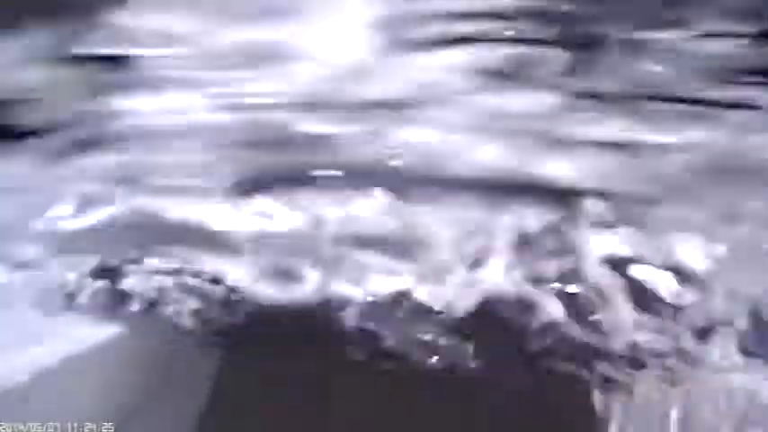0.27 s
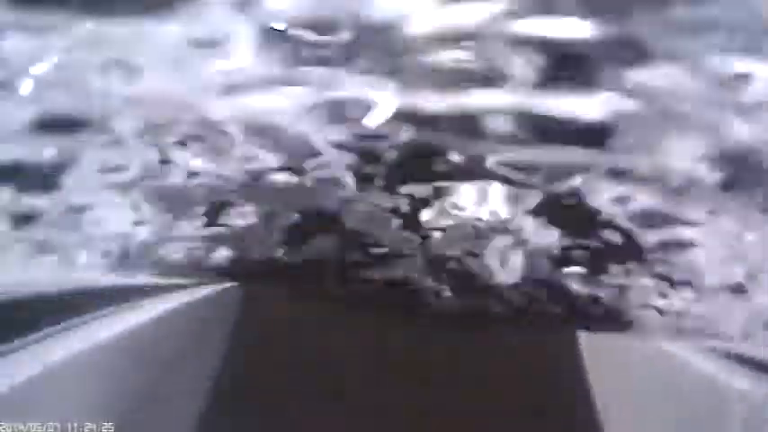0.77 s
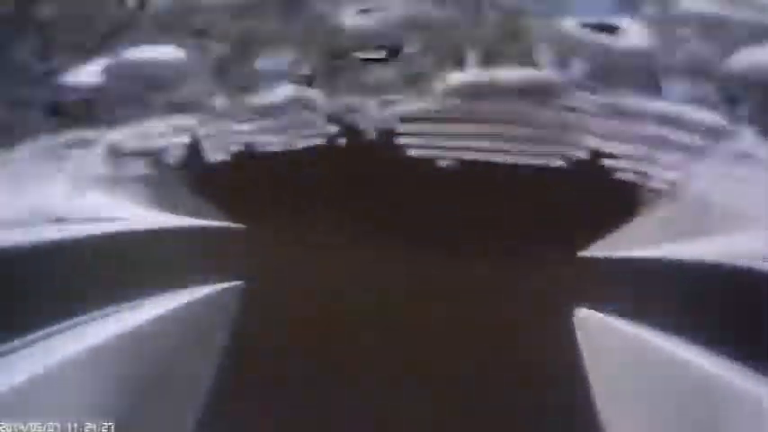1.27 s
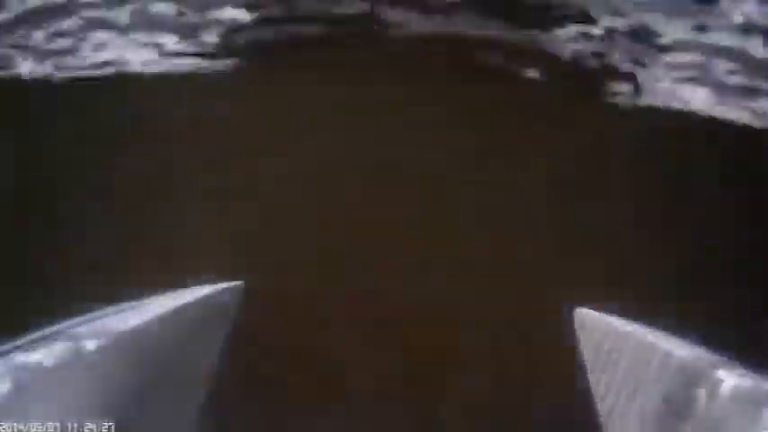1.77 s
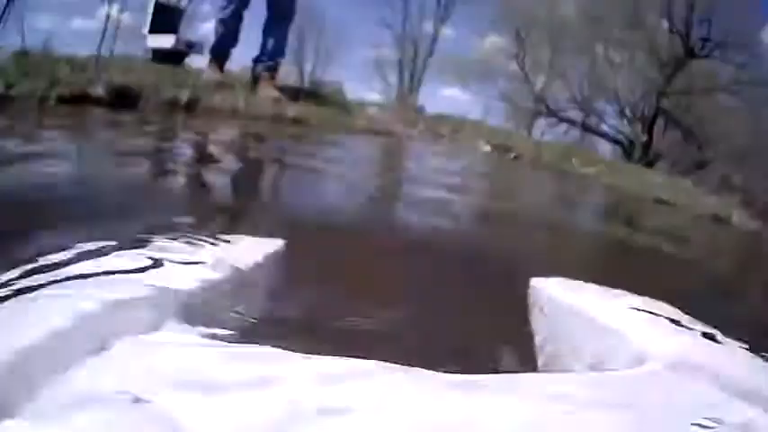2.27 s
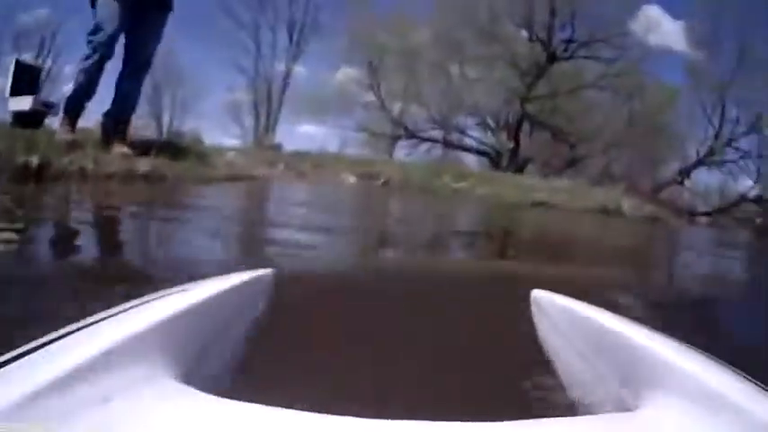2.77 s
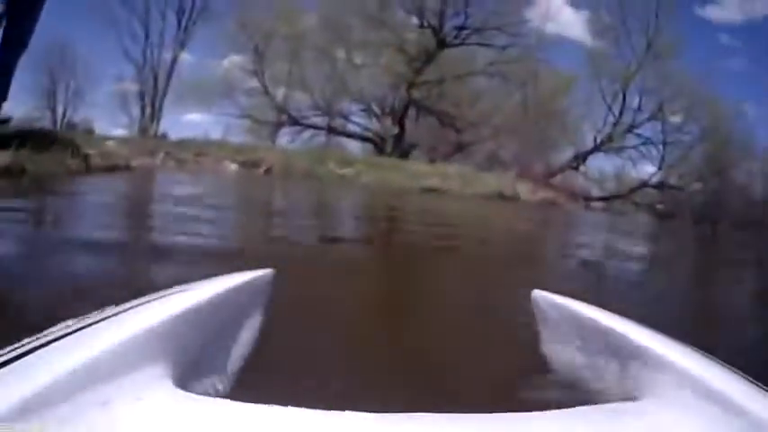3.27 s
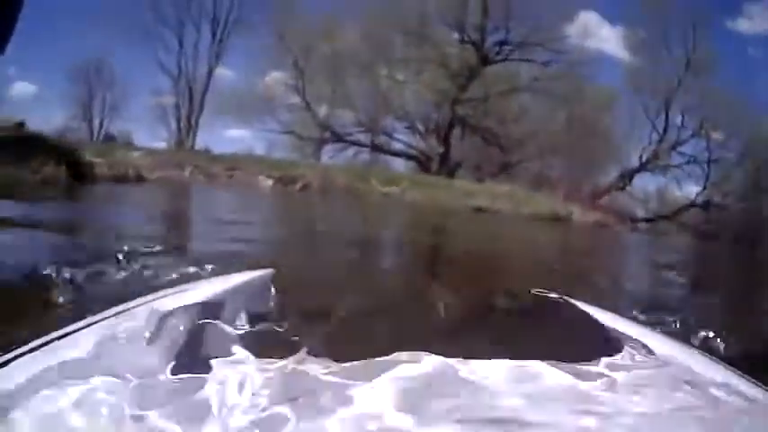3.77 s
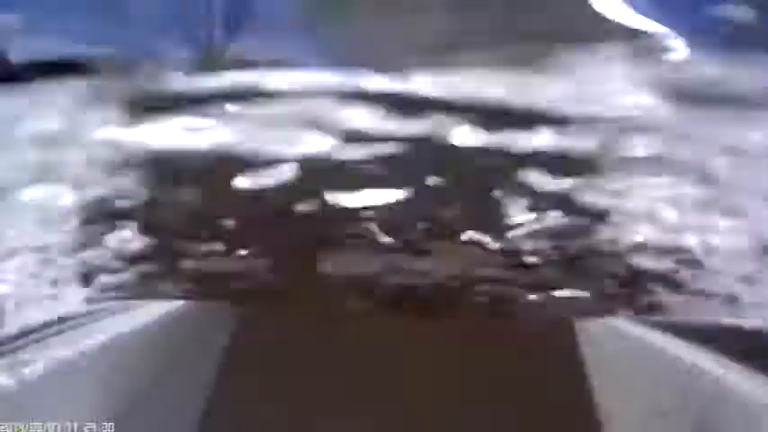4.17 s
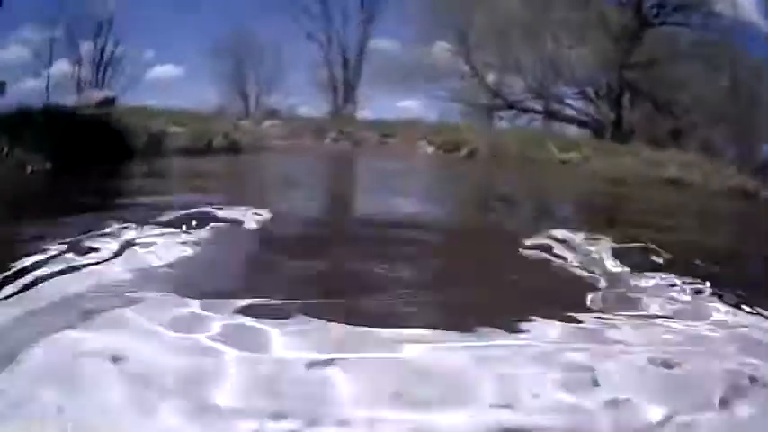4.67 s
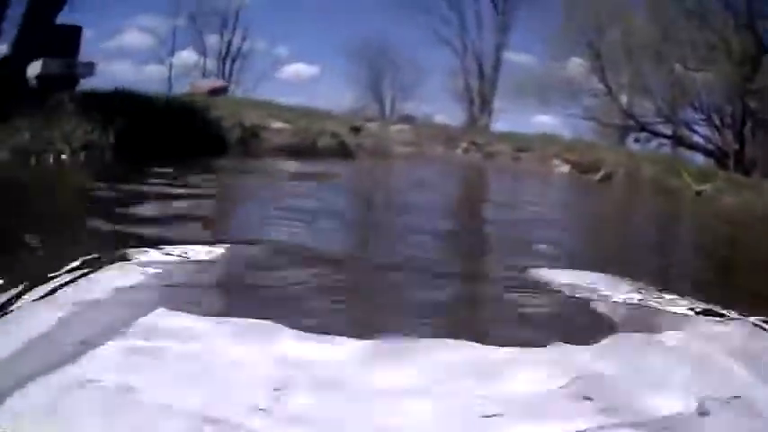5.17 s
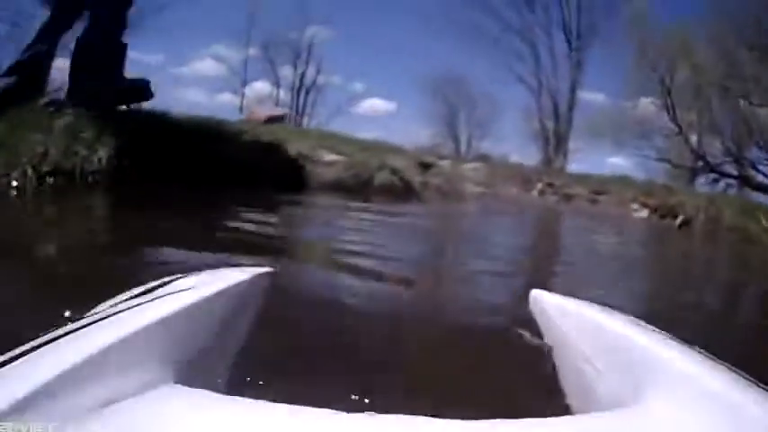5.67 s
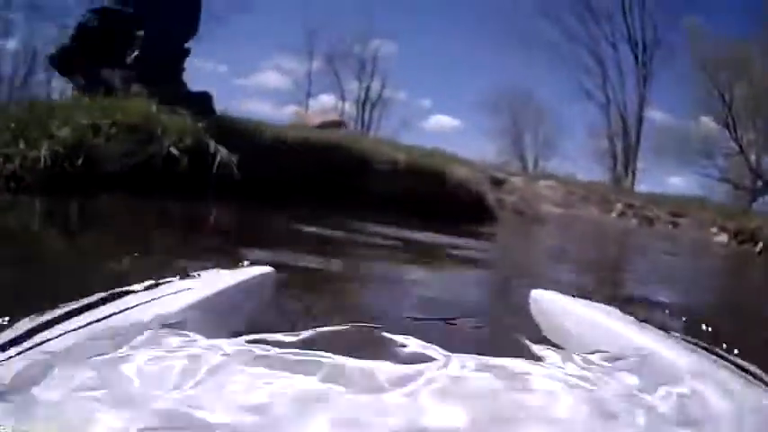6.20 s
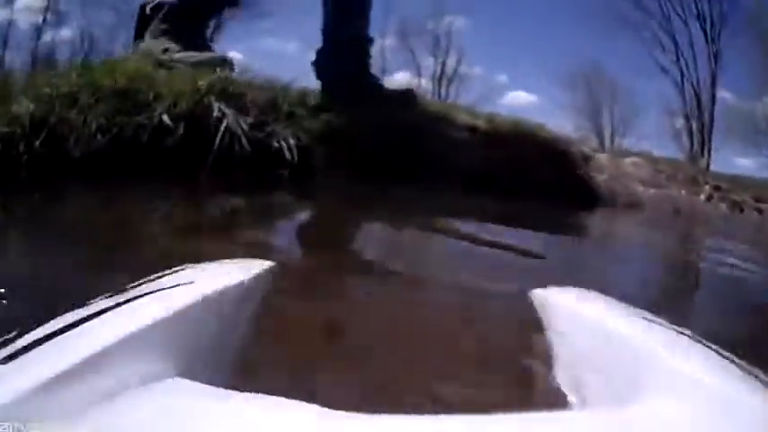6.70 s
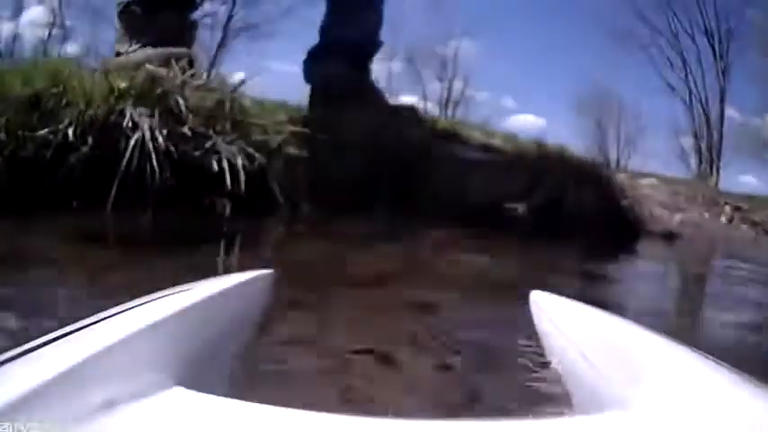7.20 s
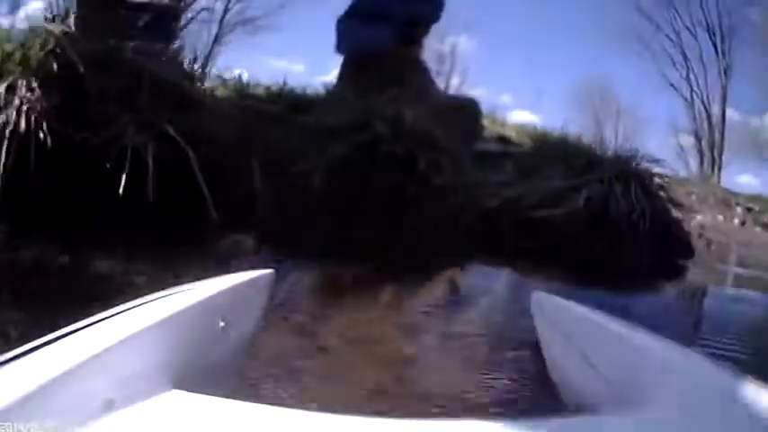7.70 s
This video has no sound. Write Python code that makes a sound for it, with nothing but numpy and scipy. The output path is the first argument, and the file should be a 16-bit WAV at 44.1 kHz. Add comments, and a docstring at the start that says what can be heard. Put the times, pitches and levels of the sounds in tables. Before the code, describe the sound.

Close inside a sealed case on a small model boat in a pond, a muffled electric drone and rattle run under water, surge as it surfaces, then sag and rev unevenly with a thin high whistle. Water churns, gulps and knocks the plastic hull. After a sharp racing rasp come short throttle bursts, dripping, a buzzing rudder servo and near silence.

```python
"""Small model boat at the edge of a pond

A small electric boat labours, heard from inside a sealed case on its deck. The shaft drones through the
plastic hull, the propeller churns water and rattles in its loose drive, and the speed controller whistles.
Throttle blips, ringing knocks, gulping air pockets and drops follow; a rudder servo buzzes, then the boat
comes to rest. Tones make the drone and whistle, shaped noise the water, struck resonances the hull."""
import sys
import numpy as np
from scipy import signal
from scipy.fft import rfft, irfft
from scipy.io import wavfile
from scipy.ndimage import uniform_filter1d

SR = 44100
rng = np.random.default_rng(int(sys.argv[2]) if len(sys.argv) > 2 else 0)


def pcm_store(signal):
    """Save signal as 16-bit PCM."""
    levels = np.round(np.clip(np.atleast_2d(signal), -1, 1) * 32767)
    wavfile.write(sys.argv[1], SR, levels.astype(np.int16).T)


N = 350233
TIME = np.arange(N) / SR   # seconds

# Speed of the shaft. Each row: time in seconds, turns per second.
SPEED = [(0.0, 137), (0.74, 121), (0.81, 131), (0.95, 113.7), (1.03, 126), (1.149, 121.7), (1.2, 112.6),
         (1.25, 125.4), (1.5, 124.8), (1.561, 116), (1.67, 125.4), (1.771, 132.6), (1.82, 147), (1.87, 159),
         (1.929, 210), (1.989, 191), (2.05, 136), (2.13, 137), (2.25, 75), (2.446, 65.5), (2.52, 82.6),
         (2.72, 66), (2.81, 60.2), (2.926, 66.4), (3.019, 95), (3.129, 66), (3.2, 52.5), (3.399, 91.5),
         (3.468, 105), (3.531, 131.6), (3.621, 112), (3.705, 79.7), (3.82, 81), (3.9, 136), (4.027, 185),
         (4.143, 117), (4.384, 58), (4.55, 75), (4.62, 63.7), (4.75, 70), (4.8, 141), (4.825, 203),
         (4.871, 227), (4.899, 186), (4.931, 130)]
# How hard the propeller works. Each row: time in seconds, effort in dB.
EFFORT = [(0.0, -34), (1.1, -32), (1.87, -34), (1.93, -28.5), (2.03, -38.5), (2.199, -41.5), (2.33, -32),
          (2.75, -33.5), (2.95, -28), (3.12, -37.5), (3.16, -44.5), (3.258, -38), (3.268, -29.5),
          (3.31, -32), (3.59, -34.5), (3.65, -46.5), (3.695, -42), (3.71, -34), (3.76, -35), (3.812, -25.5),
          (3.84, -39.5), (3.9, -28), (4.06, -31), (4.17, -49), (4.395, -41.5), (4.41, -36), (4.449, -26.5),
          (4.56, -32.5), (4.649, -41), (4.77, -32.5), (4.821, -31.5), (4.835, -20.5), (4.886, -26),
          (4.9, -42), (5.0, -61)]
# The speed controller's switching whistle. Each row: time in seconds, level in dB.
WHISTLE_LEVEL = [(0, -67), (1.79, -63), (2.04, -73.5), (2.73, -49.5), (3.49, -51), (3.72, -69), (3.83, -60),
                 (4.11, -68), (4.16, -82), (4.385, -82), (4.41, -65), (4.87, -60), (4.92, -82)]
# Ringing modes of the hull; some sounds shorten or level them.
# Each row: pitch in Hz, level in dB, time in seconds to fade by 60 dB.
HULL_MODES = [(211, 8, 0.047), (414, -4, 0.021), (535, -36, 0.0096)]
# Drifting in to the bank. Each row: time in seconds, lapping on the hull in dB, servo whirr in dB.
DRIFT_IN = [(6.078, -68, -51), (6.14, -55, -57), (6.258, -44.5, -59), (6.313, -35.5, -33.5),
            (6.42, -35.5, -38), (6.46, -45, -52.5), (6.64, -37.5, -62), (6.75, -53, -59), (6.8, -44, -43),
            (6.88, -42, -88), (7.0, -94, -66)]

SURFACES_S = 1.5   # until then the hull runs under water
DUNKED_FROM_S, DUNKED_UNTIL_S = 4.3, 4.8   # the bow dips under again
DRIPS_FROM_S, DRIPS_UNTIL_S = 4.1, 6.9
USUAL_EFFORT_DB = -35
RASP_FROM_PER_S = 189   # turns per second from which the play starts to slam shut


def from_db(db):
    """Turn decibels into gain."""
    return 10 ** (np.asarray(db) / 20)


def rms_one(x):
    """Scale to an average strength (rms) of 1."""
    return x / np.sqrt(np.mean(x ** 2) + 1e-20)


def in_time(rows):
    """Draw the columns of a timed table as curves, one value per sample."""
    s, *columns = np.transpose(rows)
    return [np.interp(TIME, s, column) for column in columns]


def during(start, end, edge_s):
    """Open a gate from start to end, with short ramps."""
    return np.clip(np.minimum(TIME - start, end - TIME) / edge_s, 0, 1)


def drift(rate_hz):
    """Wander slowly by chance with a spread of 1, worked out at every 16th sample."""
    r = np.exp(-32 * np.pi * rate_hz / SR)
    slow = signal.lfilter([1], [1, -2 * r, r * r], rng.standard_normal(N // 16 + 3002))
    slow = slow[3000:]   # skip the start-up
    return np.interp(np.arange(N) / 16, np.arange(len(slow)), rms_one(slow))


def colour(x, spectrum):
    """Filter by a (Hz, dB) spectrum that responds only after its input; rms 1."""
    hz, level_db = np.transpose(spectrum)
    grid = np.linspace(0, SR / 2, 2049)
    gain = from_db(np.interp(np.log(grid + 1), np.log(hz), level_db))
    # folding the cepstrum forward puts the response as early as possible
    cepstrum = irfft(np.log(gain))
    cepstrum[1:2048] *= 2
    cepstrum[2049:] = 0
    response = irfft(np.exp(rfft(cepstrum)))
    return rms_one(signal.fftconvolve(x, response)[:N])


def ring(clicks, hz, t60):
    """Let each click set a fading sine ringing; a unit click starts it at height 1."""
    r, w = from_db(-60 / (t60 * SR)), 2 * np.pi * hz / SR
    return signal.lfilter([0, np.sin(w)], [1, -2 * r * np.cos(w), r * r], clicks + 1e-18)


def grains(per_s, spread_db):
    """Scatter random clicks of uneven size and either sign."""
    sizes = from_db(spread_db * np.minimum(rng.exponential(1, N), 4)) * rng.choice([-1, 1], N)
    return sizes * (rng.random(N) < per_s / SR)


def firm(x):
    """Remove slow pressure, which the stiff hull does not pass."""
    return signal.sosfilt(signal.butter(3, 125, "high", fs=SR, output="sos"), x)


def case(x):
    """Colour a rattle by the sealed case, which rings narrowly under water and broadly in air."""
    # Each row: pitch in Hz, level under water in dB, level in air in dB (both per Hz).
    case_tones = [(650, -53.5, -25.5), (1090, 0, -2.5), (1450, -10.5, -9), (1710, 1.5, -4),
                  (1950, -10.5, -1), (2450, 6.5, 3), (2760, -4, -5), (3250, -5, -.5), (3600, -9, -7),
                  (3950, -13, -5), (4700, -19, -17), (7600, -26, -22), (16700, -120, -120)]
    hz, under_db, air_db = np.transpose(case_tones)
    wet = during(-1, SURFACES_S + .55, .1) + during(DUNKED_FROM_S, DUNKED_UNTIL_S, .03)
    under = colour(x, np.transpose([hz, under_db]))
    in_air = colour(x, np.transpose([hz, air_db]))
    return wet * under + (1 - wet) * in_air


def blip_gain(column, fade_s, rise_s):
    """Rise suddenly with each throttle blip and die away once it is released."""
    # Each row: start in seconds, end in seconds, strength on the hull in dB, strength of the churn in dB.
    blip_rows = [(5.005, 5.019, -31.5, -42), (5.043, 5.123, -23, -31), (5.24, 5.297, -31, -37),
                 (5.376, 5.443, -23.5, -32.5), (5.575, 5.643, -20, -29.5), (5.78, 5.861, -20.5, -25.5),
                 (5.915, 5.943, -34, -43), (5.946, 6.019, -20.5, -27)]
    total = np.zeros(N)
    for row in blip_rows:
        fade = np.exp(-np.maximum(TIME - row[1], 0) / fade_s)
        total += from_db(row[column]) * during(row[0], N / SR, rise_s) * fade
    return total


def racing_share(speed):
    """Go from 0 to 1 as the propeller starts to race near top speed."""
    return np.clip((speed - RASP_FROM_PER_S) / 12, 0, 1)


def heaves():
    """Waves passing under the hull press on it in deep lumps of low noise."""
    # Each row: middle in seconds, length (spread of the bell shape) in seconds, level in dB.
    wave_rows = [(1.83, 0.028, -25), (4.233, 0.055, -28)]
    deep = colour(rng.standard_normal(N), [(12, -14.5), (40, -26.0), (130, -6.5), (500, -24.5), (900, -76)])
    return deep * sum(from_db(db) * np.exp(-.5 * ((TIME - s) / length) ** 2) for s, length, db in wave_rows)


def lapping():
    """Lapping water stirs the hull's modes loosely, with random slops and noise."""
    stir_db = -46   # water keeps stirring the hull between throttle bursts
    slops = grains(151.5, spread_db=5.0) + 0.27 * rng.standard_normal(N)
    body = sum(from_db(.25 * db) * ring(slops, hz, .45 * t60) for hz, db, t60 in HULL_MODES)
    gain = from_db(in_time(DRIFT_IN)[0]) * during(DRIFT_IN[0][0], DRIFT_IN[-1][0], 0.017)
    gain += from_db(stir_db) * during(DRIPS_FROM_S, DRIPS_UNTIL_S, 0.017)
    return gain * rms_one(firm(body))


def gulps():
    """Air pockets close and ring with rising pitch, fading by 60 dB in 35 cycles of their first pitch."""
    # Each row: start in seconds, strength in dB, starting pitch in Hz (raised by one percent).
    pockets = [(2.32, -19, 2427), (2.94, -12, 770.6), (3.709, -28, 2577), (4.207, -26.5, 769),
               (4.228, -26.5, 3300), (4.233, -18.5, 462), (4.314, -29, 3280), (4.328, -14.5, 409.2),
               (4.33, -23, 565.4), (5.316, -28, 1404), (5.334, -31, 2460), (5.359, -25.5, 1500),
               (5.516, -29.5, 776), (5.533, -35, 3170), (5.661, -20, 1930), (6.211, -25, 873)]
    out, t = np.zeros(N), np.arange(SR // 10) / SR
    for s, strength_db, hz in pockets:
        i = int(s * SR)
        shape = np.minimum(t * hz / 2.9, 1) * from_db(strength_db - 60 * t * hz / 35)
        out[i:i + len(t)] += shape * np.sin(2 * np.pi * hz * t * (1.01 + 0.00043 * hz * t))
    return out


def drips(effort_db):
    """Drops run off the deck in clumps or fly thick as spray under power; each rings at its own pitch."""
    drip_gain, drips_per_s = from_db(-46), 70   # throttle shut
    spray_gain, spray_per_s = from_db(-8.5), 220   # flung in air; gain against the churn
    shut = (in_time(WHISTLE_LEVEL)[0] < -76) * during(DRIPS_FROM_S, DRIPS_UNTIL_S, .01)
    flung = from_db(effort_db) * during(SURFACES_S + .55, DUNKED_UNTIL_S, .05)
    flung += blip_gain(column=3, fade_s=.02, rise_s=.003)
    level = np.maximum(drip_gain * shut, spray_gain * flung)
    per_s = np.where(level > drip_gain, spray_per_s, drips_per_s)
    sizes = level * from_db(4 * np.minimum(rng.exponential(1, N), 3))
    born = rng.random(N) < per_s * from_db(5 * drift(4)) / SR   # drift bunches the drops into clumps
    pitches, dealt = np.geomspace(800, 3700, 10), rng.integers(0, 10, N)
    out = np.zeros(N)
    for k, hz in enumerate(pitches):
        drops = sizes * born * (dealt == k)
        # ringing twice softens the onset
        first_ring = ring(drops, hz, 26 / hz) * hz / SR
        out += ring(first_ring, hz, 10 / hz)
    return out


def servo():
    """Rudder gears whirr in step with control pulses; each jolt is a short ring and a puff of noise."""
    # Each row: start in seconds, strength in dB, pitch in Hz.
    jolts = [(6.103, -32.5, 2670), (6.1598, -33, 2130), (6.196, -34, 1890), (6.263, -24.5, 2490),
             (6.581, -32, 1470), (6.6358, -25.5, 2460), (6.675, -32, 3820), (6.705, -31, 3850),
             (6.7862, -31, 3200), (6.839, -28.5, 1850), (6.861, -25.5, 3280)]
    pulse_hz = 54.5
    noise = colour(rng.standard_normal(N), [(700, -41), (1500, 1.5), (4000, 4.0), (7000, -12.0), (15000, -23)])
    pulsing = np.exp(.4 * (np.cos(2 * np.pi * pulse_hz * (TIME - jolts[1][0] - .004)) - 1))
    whirr_gain = from_db(in_time(DRIFT_IN)[1] - 0.5) * during(DRIFT_IN[0][0], DRIFT_IN[-1][0], 0.012)
    out = whirr_gain * pulsing * noise
    t = np.arange(int(0.055 * SR)) / SR
    for s, strength_db, hz in jolts:
        i = int(s * SR)
        tone = .5 * np.sin(2 * np.pi * hz * t) * np.exp(-t / .004)
        puff = .3 * noise[i:i + len(t)] * np.exp(-t / .006)
        out[i:i + len(t)] += from_db(strength_db) * (tone + puff) * np.minimum(t / 0.00023, 1)
    return out


def knocks():
    """Water and bank knock on the hull: all modes ring with chance strengths, and a short crack joins in."""
    # Each row: time in seconds, strength in dB, extra for the upper modes and the crack in dB.
    knock_rows = [(3.289, -14, -2), (3.366, -17, 14), (3.823, -13, 10), (3.9, -13, -4),
                  (4.405, -22.5, 10.5), (4.437, -11.5, -1), (4.5, -12, 5), (5.049, -11, 1.5),
                  (5.092, -15, 8.5), (5.359, -31.5, 16.5), (5.395, -11.5, 10.5), (5.567, -24, 7),
                  (5.784, -21, -2), (5.854, -19, 13), (6.007, -14.5, 6), (6.532, -19, 13),
                  (6.805, -34, 19.5), (7.01, -38, 13.5), (7.324, -29, 4)]
    s, strength_db, upper_db = np.transpose(knock_rows)
    at = (s * SR).astype(int)
    chance = rng.standard_normal((len(s), len(HULL_MODES)))
    body = np.zeros(N)
    for k, (hz, db, t60) in enumerate(HULL_MODES):
        clicks = np.zeros(N)
        clicks[at] = from_db(strength_db + db + (k > 0) * upper_db - 3.5 + 1.8 * chance[:, k])
        body += ring(clicks, hz, t60)
    cracks = np.zeros(N)
    cracks[at] = from_db(strength_db + 0.8 * upper_db - 31.0)
    crack_gain = signal.lfilter([1], [1, -np.exp(-1 / (0.006 * SR))], cracks + 1e-18)   # fades over 6 ms
    return firm(body) + crack_gain * case(rng.standard_normal(N))


def beating():
    """During throttle blips, slow uneven blade blows ring the hull's modes."""
    turns = np.cumsum(66 * from_db(1.9 * drift(25.0))) / SR   # about 66 blows per second
    blows = np.diff(np.floor(turns), prepend=0) * from_db(2.4 * rng.standard_normal(N))
    push = blows + 0.041 * rng.standard_normal(N)
    body = firm(sum(from_db(db) * ring(push, hz, 0.75 * t60) for hz, db, t60 in HULL_MODES))
    even = body / np.sqrt(uniform_filter1d(body ** 2, size=4000))   # steady loudness
    return blip_gain(column=2, fade_s=0.033, rise_s=0.016) * even


def whistle(phase):
    """The controller's switching tone swells once a shaft turn, which sets side lines beside it."""
    whistle_hz, blip_db = 8120, -28.5   # in blips, level against the hull
    gain = from_db(in_time(WHISTLE_LEVEL)[0]) * during(-1, 4.9, 0.0068)
    gain += from_db(blip_db) * blip_gain(column=2, fade_s=0.009, rise_s=0.0018)
    swell_depth = np.where(TIME < SURFACES_S, .9, .35)
    swell = 1 + swell_depth * np.cos(phase + 0.5 * drift(22.0))
    tone = np.sin(2 * np.pi * whistle_hz * TIME + .4 * drift(30))
    return np.sqrt(2) * gain * from_db(2.4 * drift(22.0)) * swell * tone


def churn(speed, effort_db):
    """Water boils round the blades as unsteady noise and grains, muffled while the hull is under water."""
    # Each row: pitch in Hz, level in dB per Hz.
    froth_spectrum = [(100, -30), (220, -6), (600, 0), (850, -4), (1100, -14), (2000, -33), (7000, -48)]
    submerged_db, racing_db = -5.5, -3   # a racing propeller grips less water
    froth = rng.standard_normal(N) * from_db(2.5 * drift(30)) + grains(300, spread_db=3.5)
    gain = from_db(effort_db) * during(-1, EFFORT[-1][0], 0.017)
    gain += blip_gain(column=3, fade_s=0.024, rise_s=0.008)
    water = colour(froth, froth_spectrum) * gain
    water *= from_db(submerged_db * during(-1, SURFACES_S, 0.055))
    return from_db(-3.5) * water * from_db(racing_db * racing_share(speed))


def rattle(phase, speed, effort_db):
    """Play in the drive rattles once a turn, sharper at speed; near top speed it slams into a pitched rasp."""
    # The play slamming shut. Each row: pitch in Hz, level in dB per Hz.
    slam_spectrum = [(700, -30), (1100, -10), (1440, -20), (1770, 0), (2650, -4), (3400, 0), (4150, -25),
                     (8000, -31), (16000, -60)]
    usual_db, db_per_octave = -44.5, 5   # at usual effort and 100 turns per second; rise with speed
    follows, blip_db = 1.254, -13   # dB per dB of effort; blip level against the churn
    level_db = usual_db + follows * (effort_db - USUAL_EFFORT_DB) + db_per_octave * np.log2(speed / 100)
    gain = from_db(level_db) * during(-1, EFFORT[-1][0], 0.017)
    gain += from_db(blip_db) * blip_gain(column=3, fade_s=0.017, rise_s=.005)
    sharpness = np.clip((speed - 110) / 30, .12, 4)
    each_turn = np.exp(sharpness * (np.cos(phase - 1.2) - 1)) * np.sqrt(1 + 0.14 * sharpness)
    loose = rng.standard_normal(N) * from_db(3.2 * drift(40)) + .8 * grains(400, spread_db=3.5)
    # share of the rattle that comes as one regular blow at the same point of every turn
    least_hard = np.where(TIME < SURFACES_S, .45, .38)
    hard = np.clip((speed - RASP_FROM_PER_S) / 12, least_hard, .62)
    blows = np.diff(np.floor((phase + 1.209) / (2 * np.pi)), prepend=0)
    slaps = blows * np.sqrt(SR / speed) * from_db(-4 + 2.0 * drift(79.0))
    play = (1 - hard) * rms_one(each_turn * loose) + hard * slaps
    racing = racing_share(speed)
    return gain * ((1 - racing) * case(play) + racing * colour(play, slam_spectrum))


def drone(phase, speed, effort_db):
    """The unbalanced shaft hums; each overtone swells where it meets a hull resonance."""
    # What the hull passes on from the shaft. Each row: pitch in Hz, level in dB.
    hull_pass = [(60, -29), (110, -24), (190, 9.5), (260, -1), (420, -4.5), (570, -12), (810, -10),
                 (1050, -18.5), (1400, -24), (1900, -58)]
    # Unbalance tone at usual effort, rising through a resonance. Each row: turns per second, level in dB.
    unbalance = [(60, -74), (70, -65.5), (90, -49.5), (110, -35.5), (132, -21.5), (150, -18.5),
                 (190, -18.5), (224, -14)]
    # The hum swells and dips as the hull rises, surfaces and bobs.
    # Each row: time in seconds, change of the unbalance tone in dB, change of the overtones in dB.
    boom = [(0, -2.5, -3.5), (.7, 2.5, -17.5), (.93, 0.5, -5.5), (1.04, 5, -4.5), (1.45, 9.5, -1.5),
            (1.56, 8, 0), (1.66, 20.5, 3.5), (1.775, 16, 12), (1.81, -1, 7.5), (1.87, -7.5, 8.5),
            (1.93, 4.5, 11.5), (2.05, -4.5, 1.5), (2.53, 17.5, 5), (2.94, 12.5, 4), (3.4, 11, 1.5),
            (3.55, -1.5, 6.5), (3.8, 2, 0), (4.03, -6, 5), (4.5, 17, -4.5), (4.8, 0, 3), (4.85, 1.5, 8),
            (4.885, -5.5, 9.5), (4.905, 4, -2)]
    # Extra level in dB of each overtone, from 2 to 14 times the shaft speed.
    overtone_bias = [4.5, -2, -3.5, 1, -4, 3.5, -6, 1, -9.5, -8.5, -6.5, -4, -4]
    flooded_hz, flooded_width_hz, flooded_db = 490, 32, 23   # narrow resonance of the submerged hull
    hz, pass_db = np.transpose(hull_pass)
    extra_db = effort_db - USUAL_EFFORT_DB
    tone_db, over_db = in_time(boom)
    first_db = np.interp(speed, *np.transpose(unbalance)) + tone_db + 0.25 * extra_db
    low_db = -35 + 0.64 * extra_db + 0.32 * over_db   # overtones 2 and 3
    high_db = -39 + 0.63 * extra_db + over_db   # overtones from 4 up
    wobble = np.where(TIME < SURFACES_S, .08, .25)   # phase unrest, before it grows with the overtone's number
    out = from_db(first_db + .5 * drift(30.0)) * np.cos(phase)
    for k, bias_db in enumerate(overtone_bias, 2):
        level_db = (low_db if k < 4 else high_db) + np.interp(np.log(k * speed), np.log(hz), pass_db)
        unrest = rng.uniform(0, 1.2) + wobble * np.sqrt(k) * drift(14)
        unsteady = from_db(3 * drift(28)) * np.cos(k * phase + unrest)
        off_peak = (k * speed - flooded_hz) / flooded_width_hz
        resonance_db = flooded_db * (TIME < SURFACES_S + .11) / (1 + off_peak ** 2)
        out += from_db(level_db + bias_db + resonance_db) * unsteady
    # silent when the controller stops switching
    powered = np.clip((in_time(WHISTLE_LEVEL)[0] + 81) / 5, 0, 1)
    return np.sqrt(2) * powered * out * during(-1, SPEED[-1][0], 0.04)


def scene():
    """Add up all sources, which reach the microphone through the hull."""
    (speed,), (effort_db,) = in_time(SPEED), in_time(EFFORT)
    speed[TIME > SPEED[-1][0]] = 96   # turns per second from there on, through the blips
    phase = 2 * np.pi * np.cumsum(speed) / SR
    water = heaves() + lapping() + gulps() + drips(effort_db) + churn(speed, effort_db)
    hull = knocks() + beating()
    motor = whistle(phase) + rattle(phase, speed, effort_db) + drone(phase, speed, effort_db)
    return (water + servo() + hull + motor)[None]


def record(dry):
    """Clip the input hard, duck the preamp hiss under loud sound, and mirror the slope as coarse conversion."""
    # Preamp hiss. Each row: pitch in Hz, level in dB per Hz.
    hiss_spectrum = [(18, -42), (30, -11.5), (81, -8), (4080, -26), (10800, -30.5), (16000, -30)]
    clip, hiss_db, mirror_hz, cutoff_hz = .665, -55.5, 12096, 15800
    dry = np.clip(dry, -clip, clip)
    smooth = 1 / (.12 * SR)   # loudness followed over 0.12 s
    loud = signal.lfilter([smooth], [1, smooth - 1], dry ** 2)
    ducking = (1 + loud / from_db(-53)) ** 0.092
    hiss = from_db(hiss_db) * colour(rng.standard_normal(N), hiss_spectrum) / ducking
    # rate conversion mirrors the sound's slope round one frequency
    band = signal.sosfilt(signal.butter(4, [90, 4200], "band", fs=SR, output="sos"), dry)
    slope = signal.lfilter([1, -.975], [1], band)
    mirrored = from_db(-8) * slope * np.cos(2 * np.pi * mirror_hz * TIME)
    wet = dry + hiss + mirrored + 0.0023   # small constant offset
    return signal.sosfilt(signal.cheby2(20, 60, cutoff_hz + 200, fs=SR, output="sos"), wet)


dry = scene()
out = record(dry)
pcm_store(out)
```